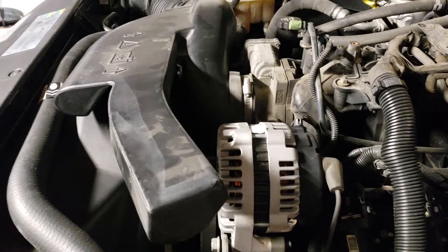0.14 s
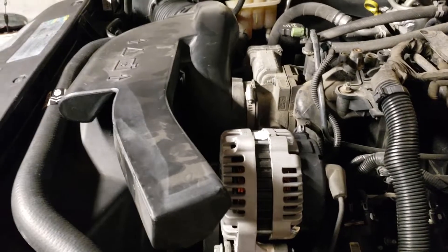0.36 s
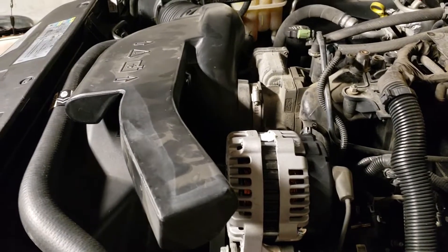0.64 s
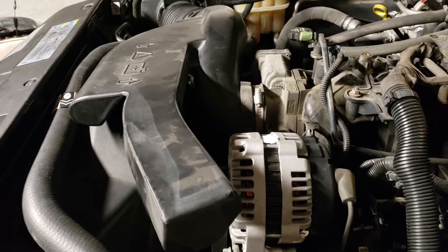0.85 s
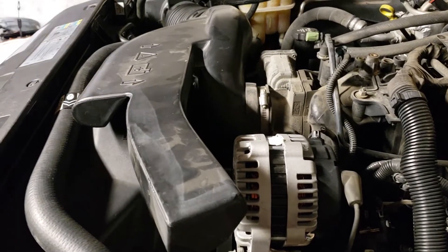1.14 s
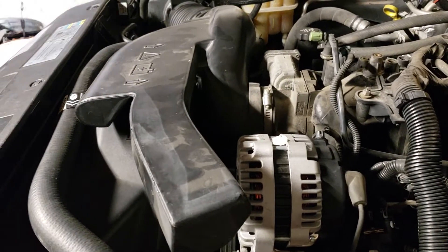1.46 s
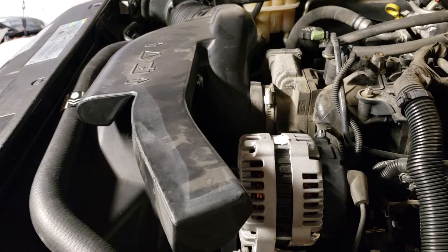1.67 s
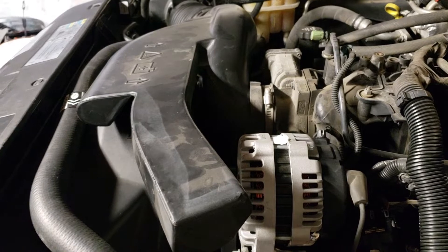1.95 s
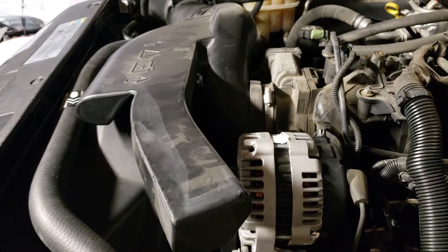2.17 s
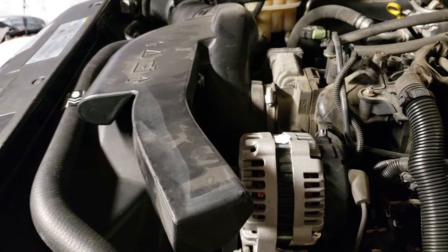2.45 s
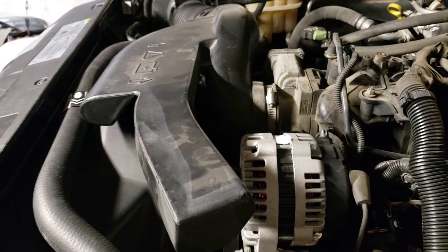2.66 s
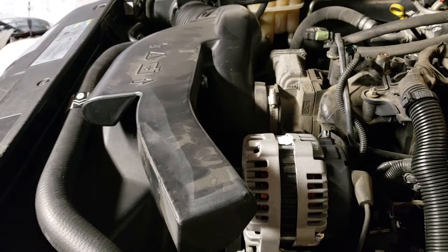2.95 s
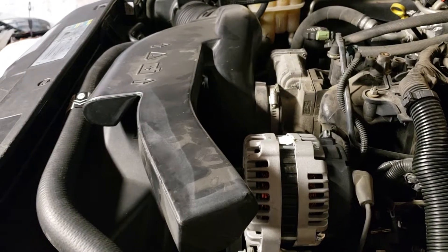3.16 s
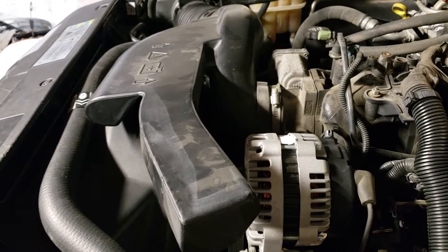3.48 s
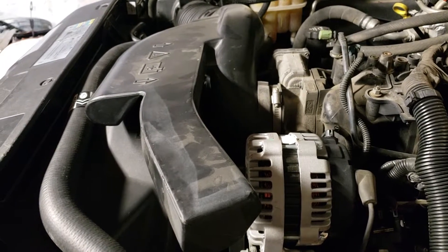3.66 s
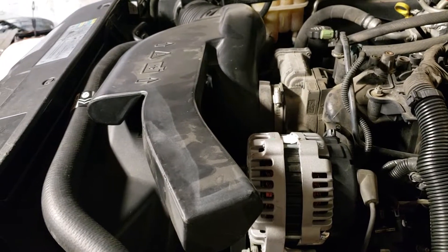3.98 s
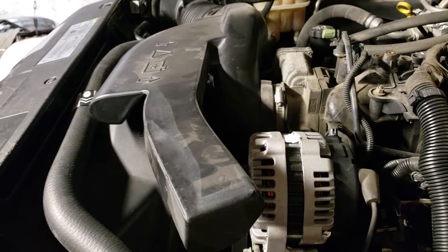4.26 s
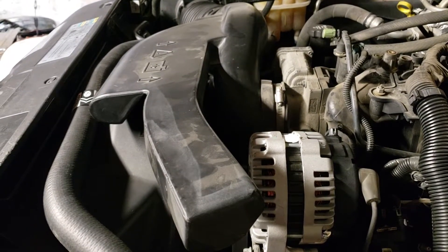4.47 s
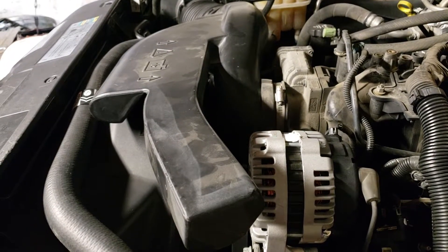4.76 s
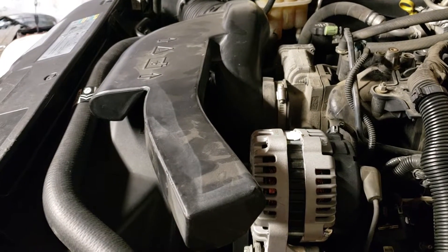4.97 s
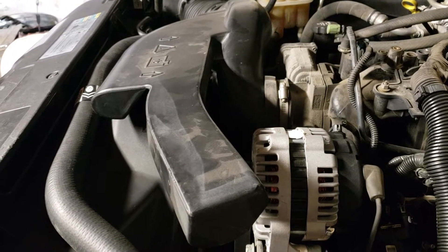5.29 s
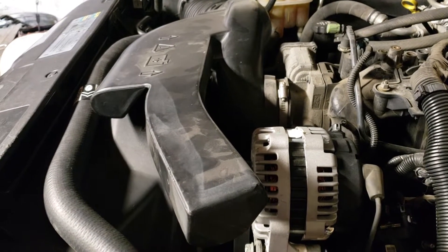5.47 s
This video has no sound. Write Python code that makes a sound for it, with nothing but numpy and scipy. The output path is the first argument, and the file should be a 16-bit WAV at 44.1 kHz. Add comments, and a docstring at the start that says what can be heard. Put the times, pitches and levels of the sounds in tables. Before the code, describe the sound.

In a garage, close above an open engine bay, a starter clunks in and grinds with a gear whine for half a second. The engine catches, revs up and sinks to a clattering idle. A hissing belt squeals in a thin, high tone that drops in pitch, nearly vanishes, returns strongly and finally weakens, with quick bright chirps throughout.

```python
"""A V8 starts and settles to idle in a garage, heard by two microphones just above the open engine bay.
Firings throb and boom at four a shaft turn under clattering noise; the speed flares, then sinks.
The belt drive hisses as filtered grains, squeals as a tone locked to the shaft and chirps once per belt lap.
Before that the starter clunks in as short noise bursts and grinds with whining gear tones for half a second.
Behind it all lies steady garage noise; the microphone rolls off the deepest bass and the top treble."""
import sys
import numpy as np
from scipy import signal
from scipy.fft import rfft, irfft, next_fast_len
from scipy.io import wavfile

SR = 44100
rng = np.random.default_rng(int(sys.argv[2]) if len(sys.argv) > 2 else 0)


def master_out(mix):
    """Clip the mix to full scale and print it as 16-bit PCM to the path in sys.argv[1]."""
    frames = np.transpose(np.atleast_2d(mix))
    ceiling = np.clip(frames, -1, 1)
    pcm = np.round(ceiling * 32767).astype(np.int16)
    wavfile.write(sys.argv[1], SR, pcm)


N = 247930
T = np.arange(N) / SR  # s
FREQS = np.maximum(np.arange(N // 2 + 1) * SR / N, 1)  # Hz

# Levels in the tables are relative: layers are trimmed again where they are mixed.
# quiet of the garage: [f/Hz, density/dB]
GARAGE_SPECTRUM = [(18, -57), (30, -44), (117, -19), (140, -22.5), (243, -36), (639, -29.5), (852, -39.5),
                   (1770, -45), (2070, -39), (2910, -48), (3980, -42.5), (15500, -43.5)]
# likeness of the two microphones: [f/Hz, correlation]
MIC_LIKENESS = [(60, .96), (130, .91), (290, 0.81), (640, 0.8), (1400, 0), (2200, 0.55), (3100, 0),
                (6000, 0)]

# shudder of the engine on its mounts: [f/Hz, density/dB]
HEAVE_SPECTRUM = [(35, -10), (60, -2), (100, -12), (300, -50)]

# solenoid, pinion meshing, pinion thrown out, engine catching, pinion snapping home:
# [t/s, level/dB, rise/s, decay/s, treble slope/dB per octave, bass slope/dB per octave]
CLUNKS = [(0.19, -30, 0.0012, 0.021, 4, 5.5), (0.205, -10.5, 0.011, 0.039, 3, 0.5),
          (0.668, -13.5, 0.0026, 0.017, 0.5, -7.5), (.748, -20, 0.037, 0.032, 2.5, -10),
          (.754, -13.5, 0.0025, 0.0072, 10, -5)]
# steel body of the clunks: [f/Hz, density/dB]
CLUNK_SPECTRUM = [(29, -54), (50, -26), (201, -8), (268, -7), (753, -2.5), (849, 7), (957, -4),
                  (5140, -11.5), (5790, -11), (7190, -23.5), (7920, -11.5), (8510, -47), (9360, -19),
                  (15500, -20)]

# starter speed, slowed by each compression, then running down: [t/s, gear mesh f/Hz, whine level/dB]
GEAR_MESH = [(.26, 445, -36), (.305, 508, -23), (.395, 630, -28), (.44, 566, -19.5), (.53, 554, -33),
             (.59, 655, -27.5), (.635, 640, -33), (.675, 600, -48), (.7, 425, -31), (.75, 389, -50)]
# overtones of the gear whine: [multiple of the mesh rate, level/dB]
MESH_ORDERS = [(.5, -11), (1, -7.5), (1.5, -9.5), (2, -17), (3, -1), (4, -15), (6, -13)]
# bell housing resonances that lift the passing gear tones: [f/Hz, width/Hz, level/dB]
HOUSING_MODES = [(860, 110, 7), (3280, 250, 10)]
# grind through the starter case: [f/Hz, density/dB]
GRIND_SPECTRUM = [(29, -40), (50, -9), (147, -13), (288, -14.5), (477, -17), (565, -5), (849, -3),
                  (1340, -2), (1660, -7), (2060, -10), (2380, -4), (5790, -5), (7020, -10), (12200, -11),
                  (15500, -14)]
# ringing above the grind: [f/Hz, width/Hz, level/dB]
GRIND_MODES = [(275, 25, 14.5), (814, 52, -1), (5730, 210, 2.5)]
# pinion rasping as the first firings overrun it: [t/s, hold/s, level/dB]
RASPS = [(.525, .035, -20.5), (0.576, 0.018, -35), (0.627, 0.035, -38)]
# ringing of the rasp: [f/Hz, width/Hz, level/dB]
RASP_MODES = [(360, 70, 14), (770, 220, 21), (1960, 130, 20), (2330, 200, 9), (3830, 550, 15),
              (5800, 800, 19)]

# belt hiss: [f/Hz, density/dB]
HISS_SPECTRUM = [(300, -23), (1300, -5), (1750, 6), (2250, 1), (2700, -0.5), (4000, 2), (5400, -1.5),
                 (6200, -1.5), (7900, -1), (9200, -6), (10400, -4), (12000, 1.5), (15500, 1.5)]
# brackets and pulleys ringing above the hiss: [f/Hz, width/Hz, level/dB]
BAY_MODES = [(2122, 59, 8), (2269, 138, 9.5), (3330, 97, 3.5), (4906, 194, 7), (5420, 180, 8),
             (7300, 43, 2), (7830, 310, 6), (13400, 200, 3.5)]
# belt slip, a short bout in the flare and a long one after it: [t/s, squeal level/dB]
SLIP = [(.88, -26.5), (1.02, -32), (1.36, -32), (1.48, -26), (1.73, -31.5), (1.82, -45), (2.05, -47),
        (2.22, -34.5), (2.5, -25.5), (3.35, -21.3), (3.7, -22.5), (4.05, -26.3), (4.3, -25.8), (4.46, -39),
        (4.8, -33), (5.35, -44.5)]
# chirp strength on successive belt laps: [level/dB]
CHIRP_LEVELS = [-18, -12, -14, -12.5, -12, -12, -19, -17, -11, -11, -20, -37, -17, -17, -17, -8.5, -11.5,
                -13, -15, -19]

# engine speed, flaring and settling, as the pitch of the locked squeal: [t/s, f/Hz]
SPEED = [(.7, 1490), (.87, 2159), (.95, 2320), (1.05, 2425), (1.28, 2410), (1.58, 2258), (1.76, 2140),
         (2.12, 1975), (2.42, 1810), (2.6, 1759), (2.78, 1753), (2.95, 1722), (3.25, 1739), (3.65, 1732),
         (4.0, 1695), (4.48, 1633), (4.85, 1636), (5.35, 1610)]
# engine effort, heard as the throb of the firings: [t/s, level/dB]
THROB = [(0.74, -45), (0.85, -29), (0.9, -33), (0.93, -41), (1.09, -38), (1.16, -44), (1.98, -45),
         (2.3, -35), (2.62, -41), (3.89, -43), (4.61, -56), (5.6, -55)]
# low tones of engine and pulleys: [cycles per shaft turn, level/dB]
SHAFT_ORDERS = [(8, -8), (9, -8), (12, -14), (13.05, -6), (17, -14), (18, -14)]
# noise of the boom: [f/Hz, density/dB]
BOOM_SPECTRUM = [(25, -23), (60, -13), (95, -8), (130, 1), (160, -7.5), (215, -2), (265, 3), (320, -17),
                 (500, -38), (1000, -52)]
# noise of the clatter: [f/Hz, density/dB]
CLATTER_SPECTRUM = [(100, -16), (330, -12.5), (470, -4), (650, 2.5), (850, -4), (1050, -5), (1400, -19.5),
                    (2000, -23)]
# block covers ringing above the clatter: [f/Hz, width/Hz, level/dB]
BLOCK_MODES = [(413, 80, 5), (490, 19, 7), (843, 9, 9), (1253, 37, 15.5)]
# how a layer follows the engine:
# [idle level/dB, dB per dB of throb, dB per octave of speed, extra level/dB as the engine catches]
BOOM_LAW = (-42, 0.3, 6.5, 11)
CLATTER_LAW = (-35, 0.1062, -1.5, 2)
HISS_LAW = (-28.5, 0.113, -0.8, 4.5)

GARAGE_DB, HEAVE_DB = -47, -45
GARAGE_T60_S, GARAGE_WET_DB = .45, -15
BAY_T60_S, BAY_WET_DB = .035, -9
SQUEAL_ORDER = 118  # squeal cycles per shaft turn
IDLE_HZ, IDLE_THROB_DB = 1730, -42  # squeal pitch and throb level at idle
CATCH_S, CATCH_LENGTH_S = 0.77, 0.029
# the gears grind in surges, one for each compression, which deepen as the crank gets going
GRIND_DB, SURGE_DB, SURGE_S, SURGE_PERIOD_S = -22, 2.5, 0.445, 0.132
SURGE_FROM_S, SURGE_GROW_S = .36, .1
RASP_RISE_S, RASP_DECAY_S = 0.013, 0.016
# a glazed patch crosses a pulley once a lap; a lap lasts a set number of squeal cycles
FIRST_LAP_S, LAP_CYCLES = .712, 463.5
CHIRP_HZ, CHIRP_SPEED_POWER = 7820, .1  # pitch at idle; it rises a little with speed
# the squeal falters just after the patch: depth for a chirp of 0 dB in the table
FALTER_DB, FALTER_DELAY_S, FALTER_LENGTH_S = -12, 0.049, 0.029
MIC_TOP_HZ, MIC_BASS_HZ = 15750, 46


def undb(db):
    """Decibels to gain."""
    return 10 ** (np.asarray(db) / 20)


def unit(x):
    """Scale to rms 1."""
    return x / np.sqrt(np.mean(x ** 2))


def curves(table):
    """Each column of a time table, sample by sample."""
    s, *columns = np.transpose(table)
    return [np.interp(T, s, column) for column in columns]


def ramp(start, length):
    """A straight rise from 0 to 1."""
    return np.clip((T - start) / length, 0, 1)


def bump(centre, length):
    """A smooth swell to 1 and back."""
    return np.exp(-((T - centre) / length) ** 2)


def envelope(start, rise, hold, decay):
    """Straight attack, hold, exponential release."""
    released = np.maximum(T - start - rise - hold, 0)
    return ramp(start, rise) * np.exp(-released / decay)


def over_hz(points):
    """Join (Hz, value) points on a log-frequency axis."""
    hz, value = np.transpose(points)
    return np.interp(np.log(FREQS), np.log(hz), value)


def colour(x, points, modes=()):
    """Filter by a broad spectrum with resonances standing on it; rms 1."""
    resonances = sum(peak / (1 + (2 * (FREQS - f) / width) ** 2) for f, width, peak in modes)
    return unit(irfft(rfft(x) * undb(over_hz(points) + resonances), N))


def noise():
    """Noise at two microphones, most alike in the bass; rms 1."""
    alike = np.clip(over_hz(MIC_LIKENESS), -1, 1)
    mid, side = rfft(rng.standard_normal((2, N))) * np.sqrt([1 + alike, 1 - alike])
    return unit(irfft(np.array([mid + side, mid - side]), N))


def walk(hz):
    """Smooth chance wandering, mostly slower than hz; spread 1."""
    size = next_fast_len(N)
    freqs = np.arange(size // 2 + 1) * SR / size
    slow = rfft(rng.standard_normal(size)) / (1 + (freqs / hz) ** 4)
    return unit(irfft(slow, size)[:N])


def turns(hz):
    """Cycles completed at a changing rate."""
    return np.cumsum(hz) / SR


def tone(cycles):
    """A sine of rms 1 with a chance starting phase."""
    return np.sqrt(2) * np.sin(2 * np.pi * (cycles + rng.random()))


def echoes(x, wet_db, t60):
    """Direct sound plus dense decaying reflections, different at each microphone."""
    t = T[:SR // 2]
    tail = rng.standard_normal((2, len(t))) * np.exp(-np.log(1000) * t / t60)
    tail /= np.sqrt(np.sum(tail ** 2, axis=1, keepdims=True))
    return x + undb(wet_db) * signal.fftconvolve(np.atleast_2d(x), tail, axes=1)[:, :N]


def garage():
    """The quiet of the garage is steady noise, heaviest in the low tones."""
    return undb(GARAGE_DB) * colour(noise(), GARAGE_SPECTRUM)


def heave():
    """A dull shudder on the mounts as the starter takes up the weight of the crank."""
    return undb(HEAVE_DB) * envelope(.22, .03, .02, 0.2) * colour(noise(), HEAVE_SPECTRUM)


def clunks():
    """Each blow of solenoid, pinion or engine is a short rattle of steel that dies in the housing."""
    out = 0
    for start, db, rise, decay, treble_db, bass_db in CLUNKS:
        body = []
        for hz, density in CLUNK_SPECTRUM:
            slope = treble_db if hz > 1000 else bass_db
            body.append((hz, density + slope * abs(np.log2(hz / 1000))))
        rattle = colour(noise() * undb(0.59 * walk(360)), body)
        out = out + undb(db) * envelope(start, rise, rise, decay) * rattle
    return out


def gear_whine(mesh, whine_db):
    """Meshing teeth sound multiples of their rate, lifted by the bell housing."""
    # backlash shakes the timing of the teeth, which smears the high overtones most
    teeth = sum(undb(db + 3 * walk(60)) * tone(k * (mesh + .02 * walk(200))) for k, db in MESH_ORDERS)
    whine = colour(teeth, [(100, 0), (10000, 0)], HOUSING_MODES) * undb(whine_db - 3.5)
    return echoes(whine, wet_db=4, t60=0.052)


def gear_grind(mesh):
    """Teeth scrape the flywheel: noise pulsing at the mesh rate and surging with each compression."""
    surge = np.cos(2 * np.pi * (T - SURGE_S) / SURGE_PERIOD_S)
    grind_db = GRIND_DB + SURGE_DB * ramp(SURGE_FROM_S, SURGE_GROW_S) * surge
    scrape = noise() * (1 + 0.16 * tone(mesh)) * undb(1.16 * walk(180))
    return undb(grind_db) * colour(scrape, GRIND_SPECTRUM, GRIND_MODES)


def pinion_rasp():
    """The pinion rasps in rough resonant noise as the first firings overrun it."""
    overrun = sum(undb(db) * envelope(start, RASP_RISE_S, hold, RASP_DECAY_S) for start, hold, db in RASPS)
    spectrum = [(100, -9), (500, 3.5), (6500, -3), (12000, -10)]  # f/Hz, density/dB
    return overrun * colour(noise() * undb(2 * walk(150)), spectrum, RASP_MODES)


def starter():
    """Gear teeth whine through the housing, grind against the flywheel and rasp when overrun."""
    mesh_hz, whine_db = curves(GEAR_MESH)
    mesh = turns(mesh_hz * (1 + .018 * walk(250)))
    engaged = ramp(0.187, 0.053) * (1 - ramp(0.773, 0.072))
    return engaged * (gear_whine(mesh, whine_db) + gear_grind(mesh) + pinion_rasp())


def laps(squeal_hz):
    """Belt travel gives each passage of the glazed patch: (s, table level dB, chirp pitch Hz)."""
    travel = turns(squeal_hz)
    marks = np.interp(FIRST_LAP_S, T, travel) + LAP_CYCLES * np.arange(len(CHIRP_LEVELS))
    times = np.interp(marks, travel, T)
    speed = np.interp(times, T, squeal_hz) / IDLE_HZ
    return list(zip(times, CHIRP_LEVELS, CHIRP_HZ * speed ** CHIRP_SPEED_POWER))


def chirps(passages, rise=0.006, width_hz=260, gain_db=-6):
    """The glazed patch slips for a few hundredths of a second and rings a narrow high band."""
    ringing = 0
    for start, db, hz in passages:
        age = np.maximum(T - start, 0) / rise
        swell = age * np.exp(1 - age)
        ringing = ringing + undb(db + gain_db) * swell * np.exp(2j * np.pi * hz * T)
    # chance level and phase, separate at each microphone, spread the tone into a band
    slip = np.array([undb(2.5 * walk(width_hz)) * np.exp(1.4j * walk(width_hz)) for _ in range(2)])
    return np.real(ringing * slip)


def slipping(passages, flutter_db=3.5, steady_db=-22, span_db=14):
    """Level of the squeal: it falters after each chirp and flutters when the slip is weak."""
    slip_db, = curves(SLIP)
    falter = sum(undb(db) * bump(start + FALTER_DELAY_S, FALTER_LENGTH_S) for start, db, _ in passages)
    weak = np.clip((steady_db - slip_db) / span_db, 0, 1)
    return slip_db + FALTER_DB * falter + flutter_db * weak * walk(16)


def squeal(hz, db):
    """A nearly pure tone locked to belt speed, trembling with the uneven pull of the shaft."""
    cycles = turns(hz * (1 + .003 * walk(45)))
    onset = ramp(.855, .012)
    voice = tone(cycles) + undb(-26) * tone(2 * cycles)
    voice = voice * undb(db + .2 + 1.3 * walk(40)) * onset
    # a rough fourth harmonic whistles once the falling speed brings it onto a pulley's resonance
    harmonic, pulley_hz, pulley_width_hz = 4, 6500, 130
    tuning = 1 / np.hypot(1, 2 * (harmonic * hz - pulley_hz) / pulley_width_hz)
    rough = np.array([tone(harmonic * cycles + 0.27 * walk(35)) for _ in range(2)])
    whistle = undb(-35.5) * tuning * rough
    pan_db = -2.0  # left over right
    pan = undb(np.array([[pan_db], [-pan_db]]) / 2)
    return echoes(voice, GARAGE_WET_DB, GARAGE_T60_S) * pan + whistle * onset


def hiss(shaft, hiss_db):
    """The belt scrapes over its pulleys in fine grains, the valves tick; the bay reflects it all."""
    valve = np.abs(8 * shaft + .2 * walk(60))  # eight ticks a shaft turn, unevenly timed
    sizes = undb(2.5 * rng.standard_normal(int(valve.max()) + 1))
    ticks = 0.91 * sizes[valve.astype(int)] * np.exp(-(valve % 1) / 0.4)
    scrape = undb(0.73 * walk(920) + .5 * walk(10))
    grains = echoes(noise() * np.hypot(scrape, ticks), BAY_WET_DB, BAY_T60_S)
    steady = colour(grains, HISS_SPECTRUM, BAY_MODES)
    # the hiss shimmers: neighbouring bands trade level back and forth
    rippled = irfft(rfft(steady) * np.cos(2 * np.pi * FREQS / 900), N)
    return undb(hiss_db + 8.5) * (steady + 0.22 * walk(22) * rippled)


def belt(squeal_hz, shaft, hiss_db):
    """The belt hisses as it speeds up, squeals as it slips and chirps on each lap."""
    passages = laps(squeal_hz)
    speeding_up = ramp(0.695, 0.14)
    whole_hiss = speeding_up * hiss(shaft, hiss_db)
    return whole_hiss + squeal(squeal_hz, slipping(passages)) + chirps(passages)


def follow(law, throb_db, squeal_hz):
    """Level of a layer from the engine's effort and speed, with a burst as it catches."""
    idle_db, per_throb, octave_db, catch_db = law
    effort_db = per_throb * (throb_db - IDLE_THROB_DB)
    speed_db = octave_db * np.log2(squeal_hz / IDLE_HZ)
    return idle_db + effort_db + speed_db + catch_db * bump(CATCH_S, CATCH_LENGTH_S)


def firing_throb(firing, shaft):
    """Four firings a turn throb; uneven firing adds a slower lope."""
    lope = 2.5 * shaft
    lope_db = -2 - 14 * ramp(1.7, .6)  # dies down as the engine settles from its flare
    even = tone(firing + 0.048 * walk(21)) * undb(1.2 * walk(14))
    return even + undb(lope_db + 2 * walk(5)) * tone(lope + 0.15 * walk(12))


def engine_boom(shaft):
    """Low noise booms together with wavering tones locked to the shaft."""
    tones = sum(undb(db + 2 * walk(1.4)) * tone(k * shaft + 0.043 * walk(5.7)) for k, db in SHAFT_ORDERS)
    rumble = colour(noise() * undb(2.0 * walk(38)), BOOM_SPECTRUM)
    return undb(-1.5) * rumble + undb(-3.0) * tones


def block_clatter(firing):
    """Noise pumped by the firings rings the block covers."""
    pumped = noise() * (1 + 0.046 * tone(firing)) * undb(1.26 * walk(48))
    left, right = colour(pumped, CLATTER_SPECTRUM, BLOCK_MODES)
    # the clatter comes from the right and reaches the left microphone a little later
    lag_s = .00016
    return np.array([np.interp(T - lag_s, T, left), right])


def engine(shaft, throb_db, boom_db, clatter_db):
    """The firing block throbs, booms and clatters, fading in as it catches."""
    firing = 4 * shaft
    throb = undb(throb_db) * firing_throb(firing, shaft)
    boom = undb(boom_db) * engine_boom(shaft)
    clatter = undb(clatter_db + 2.5) * block_clatter(firing)
    return ramp(0.74, 0.053) * (throb + boom + clatter)


def scene():
    """Starter, then the engine with its belt, over the quiet of the garage."""
    squeal_hz, = curves(SPEED)
    throb_db, = curves(THROB)
    boom_db, clatter_db, hiss_db = (
        follow(law, throb_db, squeal_hz) for law in (BOOM_LAW, CLATTER_LAW, HISS_LAW))
    shaft = turns(squeal_hz / SQUEAL_ORDER)
    background = garage() + heave()
    starting = clunks() + starter()
    running = belt(squeal_hz, shaft, hiss_db) + engine(shaft, throb_db, boom_db, clatter_db)
    return background + starting + running


def record(dry):
    """The microphone cuts the deepest bass and the top."""
    bass_cut = signal.butter(4, MIC_BASS_HZ, "highpass", fs=SR, output="sos")
    top_cut = signal.ellip(10, .2, 80, MIC_TOP_HZ, fs=SR, output="sos")
    return signal.sosfilt(top_cut, signal.sosfilt(bass_cut, dry))


dry = scene()
out = record(dry)
master_out(out)
```